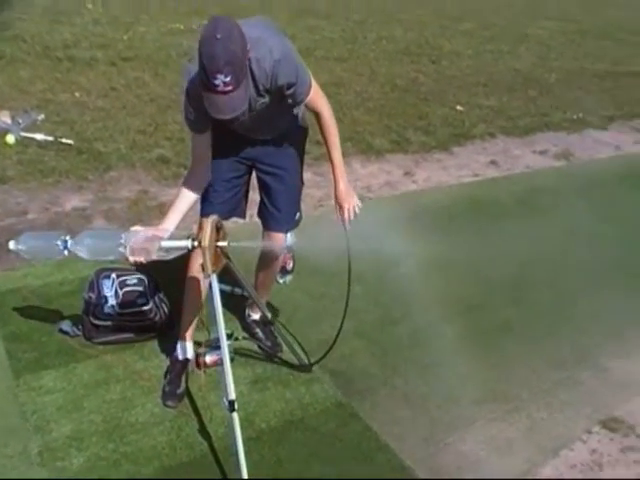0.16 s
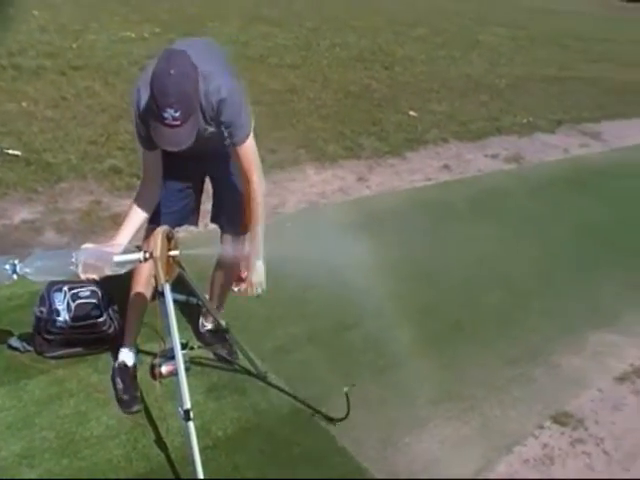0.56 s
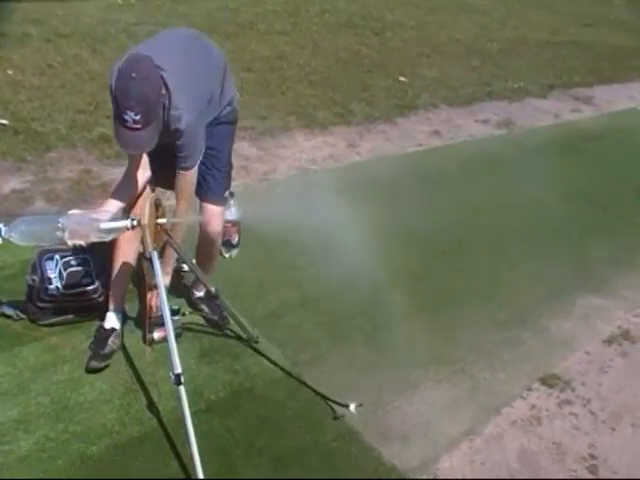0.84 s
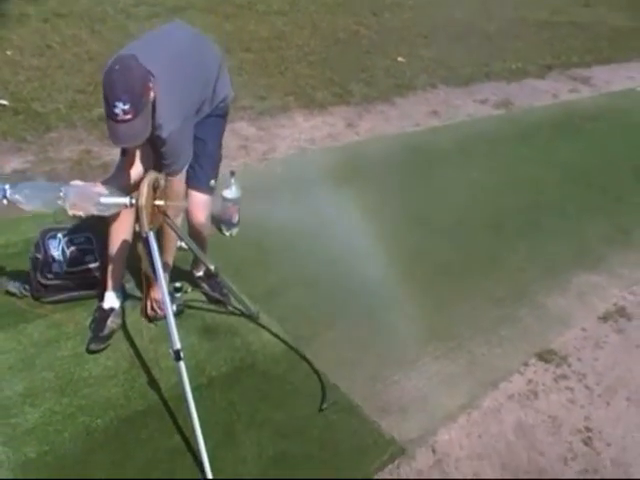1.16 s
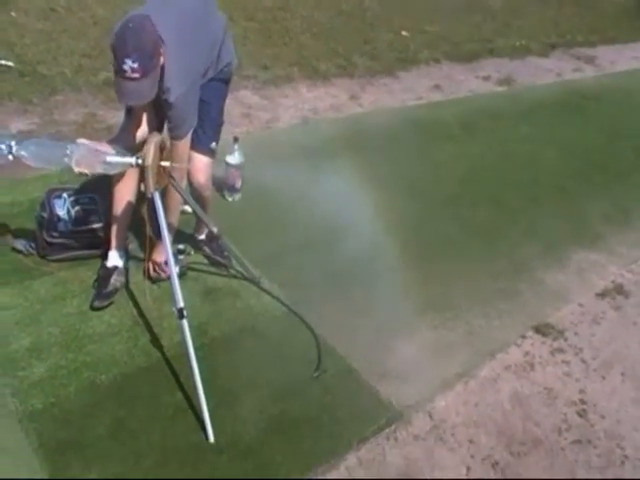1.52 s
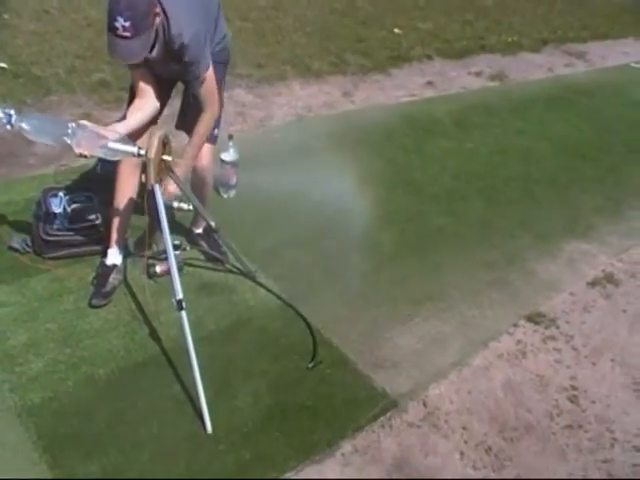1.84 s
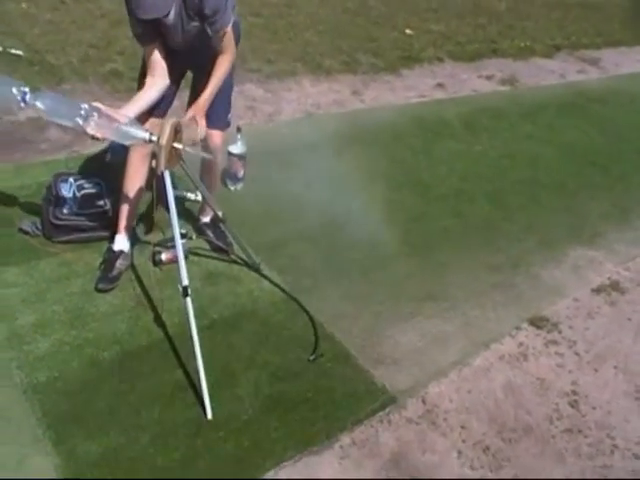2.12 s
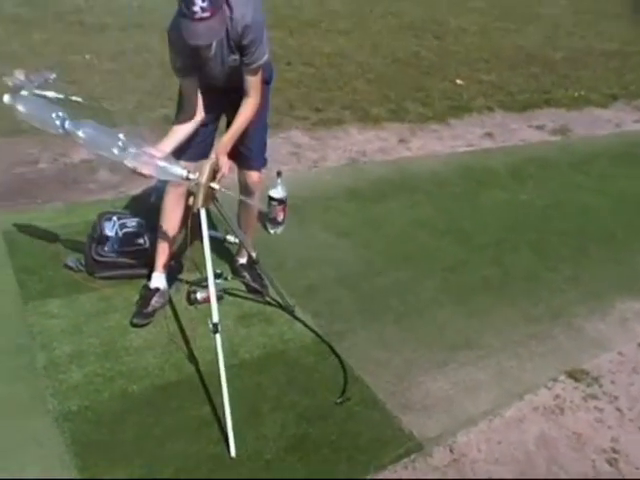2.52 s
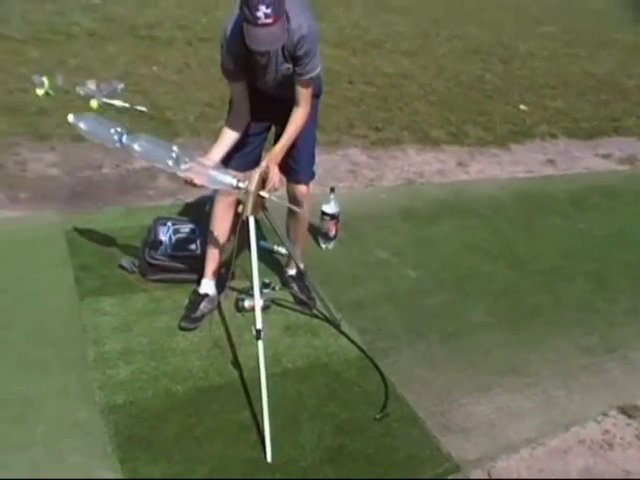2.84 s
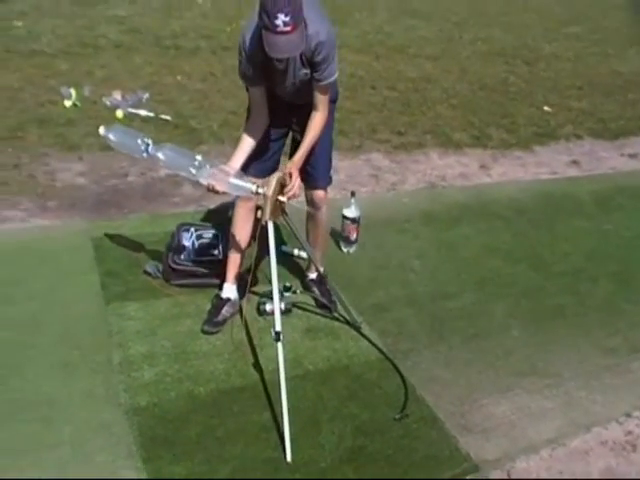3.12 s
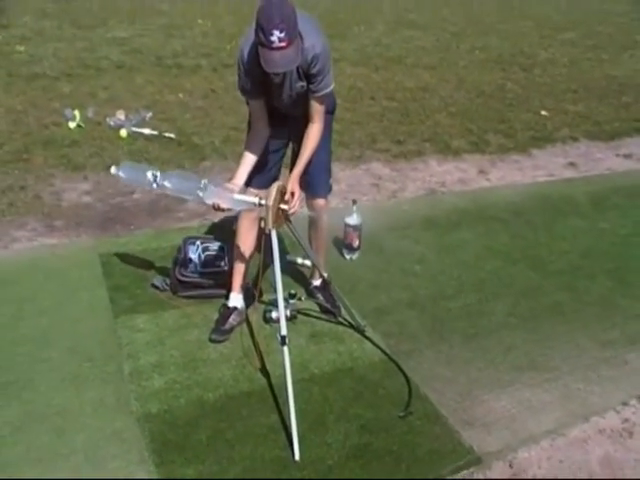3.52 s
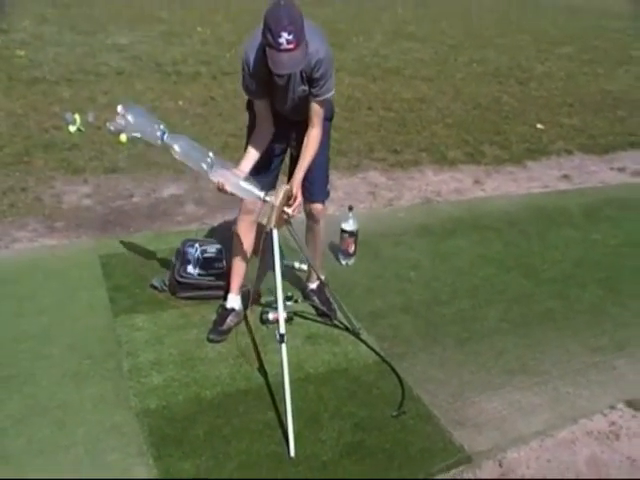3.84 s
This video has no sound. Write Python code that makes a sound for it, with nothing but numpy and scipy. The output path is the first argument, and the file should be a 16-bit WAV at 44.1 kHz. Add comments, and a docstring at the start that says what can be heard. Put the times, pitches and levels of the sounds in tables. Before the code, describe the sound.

Water and air hiss from a bottle rocket, weakening while gusts of wind rumble in.

```python
"""On a lawn, a bottle rocket blows off water and air through its nozzle: a broad spluttering hiss,
heard directly and once more off the grass. Wind rises and buffets the two microphone ports, the left
one harder, with roar, rasp, rumble and single thumps. While it blows, the heard level of the hiss dips
briefly again and again. A distant motor drones, one pulse a turn, until it is switched off."""
import sys
import numpy as np
from scipy import signal
from scipy.fft import rfft, irfft, next_fast_len
from scipy.io import wavfile
from scipy.ndimage import uniform_filter1d, map_coordinates

SR = 44100
rng = np.random.default_rng(int(sys.argv[2]) if len(sys.argv) > 2 else 0)


def int16_out(signal):
    """Quantize to a 16-bit WAV file."""
    q = np.round(np.clip(np.atleast_2d(signal).T, -1, 1) * 32767)
    wavfile.write(sys.argv[1], SR, q.astype(np.int16))


N = 175077

# Jet envelope. Each row: time in seconds, level in dB, treble in dB (applied about its mean).
JET_ENVELOPE = [(0, -17.5, -6), (.05, -19.5, -2.5), (.12, -23.5, -2.5), (.2, -24, -1.5), (.31, -19.5, -3),
                (.45, -22.5, -0.5), (.7, -21.5, -2.5), (.9, -22.5, -2.5), (1.3, -23, -3.5),
                (1.55, -26.5, -7.5), (1.7, -25, -2.5), (1.88, -28, -7.5), (2.05, -27, -5), (2.17, -29, -3),
                (2.27, -31.5, -6), (2.4, -31, -3.5), (2.52, -32.5, -6.5), (2.75, -31.5, -5.5),
                (2.86, -31, -4.5), (3.0, -33.5, -8.5), (3.15, -33.5, -6.5), (3.35, -31, -6),
                (3.5, -29, -4.5), (3.75, -29.5, -4.5), (3.97, -29, -0.5)]
# Jet sputter. Each row: depth in dB, rate in Hz.
SPUTTER_DEPTHS = [(.5, 55), (.9, 110)]
# Nozzle resonances. Each row: time in seconds, then gain in dB for each of RESONANCE_HZ.
RESONANCE_GAINS = [(0, -0.5, 2, -0.64), (.35, -3.5, 1, 1.8), (.6, -2, 0, 0.37), (.9, -1, -0.5, 1),
                   (1.2, 0.5, -1, 1), (1.6, -1, -1, -0.63), (2.1, 3, 0.5, -1.3), (2.6, -3, 1.5, 0.2),
                   (3.1, -4, 1, 1), (3.5, -1.5, -0.5, 0), (3.97, 1.5, 0, 0.21)]
RESONANCE_HZ, RESONANCE_WIDTH_HZ = [2450, 3530, 4450], 370
# Hiss spectrum at the left and right port. Each row: frequency in Hz, gain in dB.
HISS_LEFT = [(60, -16), (270, -22), (500, -11.5), (900, -8), (1500, -3), (2300, -1), (2700, -1),
             (3300, -0.5), (3900, -2.5), (4500, -3), (4900, -14), (5300, -4), (5800, -4), (6400, -6.5),
             (7500, 0.5), (8700, 0.5), (9800, -4.5), (10700, -18), (11200, -23), (12500, -29), (13500, -69)]
HISS_RIGHT = [(60, -26), (270, -8), (500, -8.5), (900, -4.5), (1500, -3.5), (2300, -4.5), (2700, -3.5),
              (3300, -2), (3600, 1), (4100, -4), (4600, 0.5), (5500, -3.5), (6400, -5.5), (7200, -5.5),
              (8300, -8), (9800, -12), (10700, -17.5), (11200, -23.5), (12500, -32), (13500, -70)]
# Full phase lead of the left port. Each row: frequency in Hz, lead in radians.
LEFT_LEAD = [(100, 0), (1500, .35), (2900, .05), (4500, .2), (5500, 1.1), (6200, 1.9), (7000, 2.4),
             (8000, 1.7), (9000, 1.4), (10000, .35), (11000, 0)]
# Scattered hiss. Each row: frequency in Hz, gain in dB.
SCATTER_SPECTRUM = [(100, -10), (700, -8), (1200, -5), (2000, -5.5), (2800, -8.5), (4200, -8), (5500, -8.5),
                    (8000, -4), (11000, -4)]
# The microphone turns. Each row: time in seconds, share of the lead, scatter gain in dB.
MIC_TURN = [(0, 0.88, -6), (1.6, 1, 6), (2.6, 1, 7), (3.97, 0.32, -1.5)]
# Ground path. Each row: time in seconds, delay in ms, gain in dB.
GROUND_PATH = [(0, 2.125, -2), (.5, 2.112, -2), (.8, 2.09, -2), (1.0, 2.045, -1.8), (1.2, 2.0, -1.5),
               (1.4, 1.95, -1), (1.7, 1.93, -1), (2.1, 1.9, -.5), (2.6, 1.882, 0), (3.97, 1.865, 0)]
# Reflection off grass. Each row: frequency in Hz, gain in dB.
GRASS_GAIN = [(300, -2), (800, -5), (1200, -.6), (1800, -.2), (2400, -.3), (3000, -2), (3600, -5),
              (4300, -5.5), (5600, -3), (7000, -4), (10000, -7)]
# Phase shift off grass. Each row: frequency in Hz, shift in radians.
GRASS_PHASE = [(500, 0), (800, .5), (1250, -.5), (1800, -.1), (2350, -.45), (2900, 0)]
# Brief level dips at the microphone. Each row: time in seconds, depth in dB, width in ms.
MIC_DIPS = [(0.134, 3, 15), (.622, 2.5, 12), (1.56, 1.5, 12), (2.228, 3, 66), (2.274, 7, 14),
            (2.449, 14.5, 34), (2.494, 7.5, 24), (2.548, 6, 8.5), (2.662, 6, 9.9), (2.76, 14, 4.6),
            (2.791, 8, 7.8), (2.908, 5, 16), (2.933, 4, 15), (2.958, 6, 9.9), (2.99, 18, 5.9),
            (3.021, 6, 6.5), (3.043, 10, 9), (3.08, 6.5, 26), (3.135, 10, 14), (3.234, 5, 8.9),
            (3.294, 9, 5.2), (3.361, 6.5, 13)]
# The highest band heard fades and returns. Each row: time in seconds, gain in dB.
BAND_EDGE_FADE = [(0, 9), (1, -2), (2, -10), (2.7, -16), (3.6, -22), (3.97, 12)]

# Gusts. Each row: time in seconds, strength in dB, left minus right in dB.
GUSTS = [(0.0, -37, -1), (0.11, -36, -1.5), (0.74, -43.5, -5), (1.07, -36.5, 1), (1.12, -48, -18),
         (1.17, -32, -17), (1.2, -34, 8), (1.27, -42, -3), (1.55, -45, -6), (1.73, -40, 0),
         (1.78, -36, -11), (1.83, -35, 12), (1.89, -39, -5), (1.94, -41, -4), (1.98, -31, 6),
         (2.03, -28.5, 10), (2.07, -32, 10), (2.12, -26.5, 14), (2.18, -28.5, 9.5), (2.22, -30, 11),
         (2.35, -32, 10), (2.47, -26.5, 14), (2.5, -25, 9), (2.56, -18.5, 2), (2.63, -17, 5.5),
         (2.7, -23.5, 9.5), (2.77, -21, 7.5), (2.82, -21, 10.5), (2.88, -18, 9.5), (2.93, -23.5, 14.5),
         (3.0, -22, 12), (3.16, -18.5, 7), (3.23, -22.5, 13.5), (3.38, -16, 1.5), (3.41, -17.5, 8.5),
         (3.55, -21, 3), (3.58, -23, 16), (3.65, -24, 11.5), (3.71, -18, 0), (3.77, -18, 4.5),
         (3.81, -19, -0.5), (3.86, -33, 20.5), (3.91, -16.5, -11.5), (3.95, -16, 3), (3.97, -19, -4)]
# Wind roar. Each row: frequency in Hz, left and right relative density in dB.
ROAR_SPECTRUM = [(25, -11, -18), (45, 2, 4), (74.5, -1, 1), (126, 1.5, -1.5), (202, -0.5, -3.5),
                 (327, -9.5, -16), (650, -17.5, -28), (1240, -54, -50)]
# Wind rasp and rumble. Each row: frequency in Hz, relative density in dB.
RASP_SPECTRUM = [(60, -13), (200, 0.5), (350, -2.5), (600, -8), (1000, -10), (1500, -19), (2000, -29.5),
                 (3000, -62)]
RUMBLE_SPECTRUM = [(12, -2), (25, 17), (45, 10), (75, 13), (110, 16), (170, -37)]
# Extra rasp. Each row: time in seconds, gain in dB.
RASP_BOOST = [(2.0, 3.5), (2.3, 1), (2.5, 1), (2.58, 3), (2.64, 0.5), (2.73, 0.5), (2.88, 2.5), (3.0, 1),
              (3.1, -1.5), (3.3, 3.5), (3.45, -2), (3.6, -1.5), (3.8, 0), (3.95, 6)]
# Rumble envelope. Each row: time in seconds, level in dB.
RUMBLE_ENVELOPE = [(0, -57), (.15, -46), (.4, -49), (.7, -47), (1.0, -47), (1.18, -44), (1.3, -37),
                   (1.55, -43), (1.7, -39), (1.8, -37), (1.92, -48), (2.05, -27), (2.15, -43), (2.3, -42),
                   (2.6, -43), (3.0, -45), (3.4, -32), (3.75, -55), (3.86, -32), (3.95, -28)]
# Single eddies. Each row: centre in seconds, envelope peak in dB, left minus right in dB, pitch in Hz.
EDDY_HITS = [(1.704, -27, 0, 90), (1.793, -22, -7, 80), (1.83, -29, 8, 120), (2.019, -24, 4, 90),
             (2.051, -22, 10, 79), (2.082, -22, 14, 110), (2.181, -18, 16, 110), (2.736, -19, 3, 131),
             (3.801, -9.5, 3, 90), (3.919, -13, -8, 70)]

# Motor hum. Each row: multiple of the shaft rate, relative level in dB.
MOTOR_ORDERS = [(2, -7.5), (3, -7), (4, -5.5), (5, -1), (6, 3.5), (7, 0), (8, -4.5), (10, -2), (11, -3),
                (12, -12), (14, -8), (15, -5), (16, -2)]
# Motor rattle. Each row: frequency in Hz, relative density in dB.
RATTLE_SPECTRUM = [(150, -30), (250, 8), (400, 1), (650, 11), (1000, -32)]


def jet(gain_db=5, treble_hz=6440):
    """Water and air leave the nozzle as turbulent, sputtering hiss."""
    level_db, treble_db = curves(JET_ENVELOPE)
    level_db = level_db + sum(flutter_db(*row) for row in SPUTTER_DEPTHS)
    noise = spray()
    hiss = at_ports(noise + ground_bounce(noise))
    treble = filtered(hiss, lambda hz: 1 / (1 + (treble_hz / (hz + 1)) ** 8))
    hiss = hiss + (amp(treble_db - treble_db.mean()) - 1) * treble
    hiss = nozzle_resonances(band_edge_fade(hiss))
    return amp(gain_db + level_db) * hiss / np.sqrt(np.mean(hiss ** 2))


def spray(depth_db=1.2):
    """Uneven spray: three white noises share quick and slow gain patches in time and frequency."""
    spectra = signal.stft(rng.standard_normal((3, N)), nperseg=256)[2]
    gain_db = 0
    for bins, frames in ((5, 4), (3, 50)):
        patches = uniform_filter1d(rng.standard_normal(spectra.shape[1:]), bins, axis=0)
        patches = uniform_filter1d(patches, frames, axis=1)
        gain_db += depth_db * patches / patches.std()
    return signal.istft(spectra * amp(gain_db), nperseg=256)[1][:, :N]


def nozzle_resonances(hiss):
    """Three resonances swell and sink as water gives way to air."""
    change = 0
    for centre_hz, gain_db in zip(RESONANCE_HZ, curves(RESONANCE_GAINS)):
        band = filtered(hiss, lambda hz: np.exp(-((hz - centre_hz) / RESONANCE_WIDTH_HZ) ** 2))
        change += (amp(gain_db) - 1) * band
    return hiss + change


def ground_bounce(noise, waver_db=1.2):
    """The lawn returns a delayed, coloured copy that weakens now and then."""
    delay_ms, gain_db = curves(GROUND_PATH)
    bounce = filtered(noise, lambda hz: amp(along(GRASS_GAIN, hz)) * np.exp(1j * along(GRASS_PHASE, hz)))
    delayed = [map_coordinates(row, [np.arange(N) - delay_ms * SR / 1000]) for row in bounce]
    return amp(gain_db - np.abs(waver_db * wobble(8))) * delayed


def at_ports(noise, min_share=0.5):
    """One noise reaches both ports, the left first; the other two arrive scattered, one at each."""
    def colour(hz):
        return amp([along(HISS_LEFT, hz), along(HISS_RIGHT, hz)])

    def with_lead(share):
        halves = [share / 2, -share / 2]
        return filtered(noise[0], lambda hz: colour(hz) * np.exp(1j * np.outer(halves, along(LEFT_LEAD, hz))))

    lead_share, scatter_db = curves(MIC_TURN)
    blend = np.clip((lead_share - min_share) / (1 - min_share), 0, 1)
    coherent = blend * with_lead(1) + (1 - blend) * with_lead(min_share)
    scattered = filtered(noise[1:], lambda hz: colour(hz) * amp(along(SCATTER_SPECTRUM, hz)))
    return coherent + amp(scatter_db) * scattered


def mic_dips(fall_share=0.62):
    """Gain that ducks at listed times, as when wind overloads a microphone; returns quicker than it falls."""
    t = np.arange(N) / SR
    loss_db = 0
    for time_s, depth_db, width_ms in MIC_DIPS:
        offset_ms = 1000 * (t - time_s) - width_ms / 8
        side_ms = width_ms * np.where(offset_ms < 0, fall_share, 1 - fall_share)
        loss_db += depth_db * 0.5 ** ((offset_ms / side_ms) ** 4)
    return amp(-loss_db)


def band_edge_fade(x, edge_hz=10900):
    """The highest band heard, above edge_hz, fades and returns."""
    gain_db, = curves(BAND_EDGE_FADE)
    return x + (amp(gain_db) - 1) * filtered(x, lambda hz: hz > edge_hz)


def wind(gain_db=1.5, rasp_growth=0.4, pivot_db=-13.5, skew=0.09, highpass_hz=35):
    """Each port has its own eddies: lumpy roar and rumble, and a rasp that grows faster than the roar."""
    strength_db, pan_db = curves(GUSTS)
    port_db = strength_db + gain_db + pan(pan_db)
    lumps_db = np.array([flutter_db(0.8, 60) + flutter_db(1.1, 110) for _ in range(2)])
    flicker_db = np.array([flutter_db(2.1, 200) for _ in range(2)])
    rasp_db = np.array([[-6], [-21]]) + flicker_db + curves(RASP_BOOST)[0]
    rasp_db += rasp_growth * (port_db - pivot_db + lumps_db)
    push = amp(lumps_db) * (stereo_noise(ROAR_SPECTRUM) + amp(rasp_db) * stereo_noise(RASP_SPECTRUM))
    push += skew * push ** 2  # pushes peak more than pulls
    push = filtered(push, lambda hz: (1j * hz / (highpass_hz + 1j * hz)) ** 2)
    rumble_db, = curves(RUMBLE_ENVELOPE)
    return amp(port_db) * push + amp(rumble_db + lumps_db) * stereo_noise(RUMBLE_SPECTRUM)


def thumps(half_width_cycles=0.58):
    """Single eddies strike the ports: a push, then a pull."""
    t = np.arange(N) / SR
    pressure = 0
    for centre_s, peak_db, pan_db, pitch_hz in EDDY_HITS:
        cycles = (t - centre_s) * pitch_hz
        envelope = amp(peak_db + pan(pan_db)) * np.exp(-(cycles / half_width_cycles) ** 2)
        pressure += envelope * np.cos(2 * np.pi * cycles + np.pi / 4)
    return pressure


def motor(shaft_hz=55.22, gain_db=-42.5, off_s=1.68, fade_s=0.013, spread_rad=0.9):
    """One pulse a turn: wavering multiples of the shaft rate and a puff of noise, until switch-off."""
    shaft_rad = 2 * np.pi * np.cumsum(shaft_hz * (1 + 0.0008 * wobble(3.56))) / SR
    hum = 0
    for order, level_db in MOTOR_ORDERS:
        level = np.sqrt(2) * amp(level_db + 2.4 * wobble(6.15))
        hum += level * np.cos(order * shaft_rad + spread_rad * rng.standard_normal())
    rattle = amp(-1) * stereo_noise(RATTLE_SPECTRUM, envelope=1 + np.cos(shaft_rad))
    running = np.clip((off_s - np.arange(N) / SR) / fade_s, 0, 1)
    return running * (hum + rattle) * amp(gain_db + pan(-2))


def stereo_noise(spectrum, envelope=1):
    """Two independent noises, modulated, then coloured; unit RMS."""
    white = envelope * rng.standard_normal((2, N))
    return unit(filtered(white, lambda hz: amp(along(spectrum, hz))))


def flutter_db(depth_db, rate_hz):
    """Quick random level changes without slow drift."""
    curve = wobble(rate_hz)
    return depth_db * unit(curve - uniform_filter1d(curve, size=int(4 * SR / rate_hz)))


def wobble(rate_hz):
    """Smooth random curve with knots at rate_hz."""
    return map_coordinates(rng.standard_normal(N // 100), [np.arange(N) * rate_hz / SR])


def filtered(x, response):
    """Apply a complex frequency response."""
    size = next_fast_len(N + 8192)
    return irfft(rfft(x, size) * response(np.fft.rfftfreq(size, 1 / SR)), size)[..., :N]


def along(rows, hz):
    """Interpolate a table over log frequency."""
    knots_hz, *columns = np.transpose(rows)
    return np.squeeze([np.interp(np.log(hz + 1), np.log(knots_hz + 1), c) for c in columns])


def curves(rows):
    """Interpolate a table over time, one value per sample."""
    knots_s, *columns = np.transpose(rows)
    return [np.interp(np.arange(N) / SR, knots_s, c) for c in columns]


def pan(left_minus_right_db):
    return np.outer([0.5, -0.5], left_minus_right_db)


def amp(db):
    return 10 ** (np.asarray(db) / 20)


def unit(x):
    return x / np.sqrt(np.mean(x ** 2, axis=-1, keepdims=True) + 1e-20)


def scene():
    return jet() * mic_dips() + motor() + wind() + thumps()


def record(dry):
    """Soft clipping at full scale, then a 13.1 kHz band limit."""
    clipped = dry / (1 + np.abs(dry) ** 6) ** (1 / 6)
    return filtered(clipped, lambda hz: hz < 13100)


dry = scene()
out = record(dry)
int16_out(out)
```